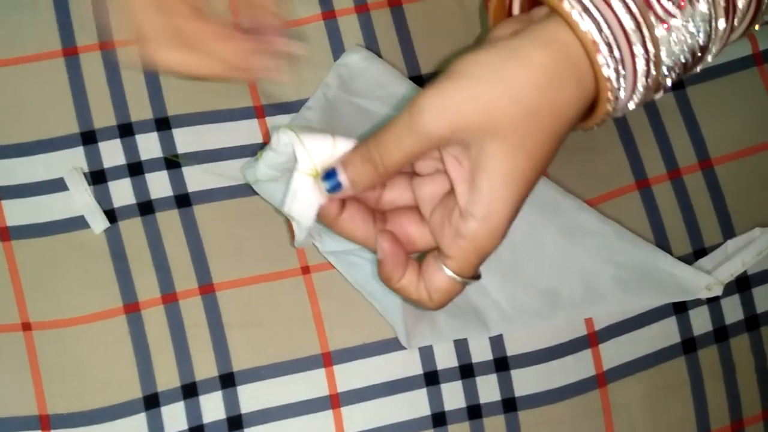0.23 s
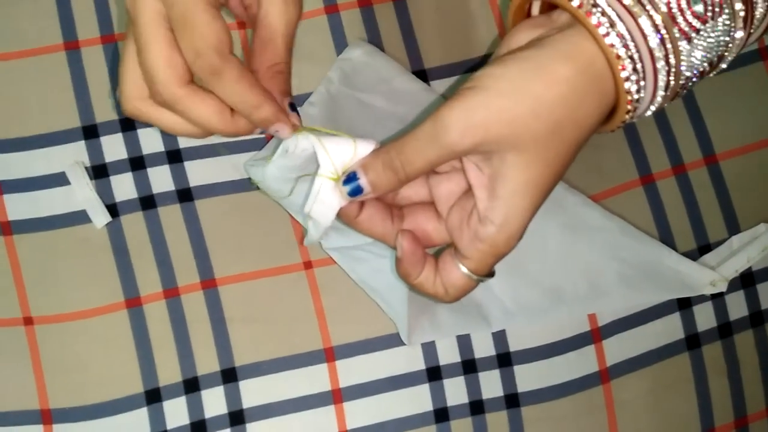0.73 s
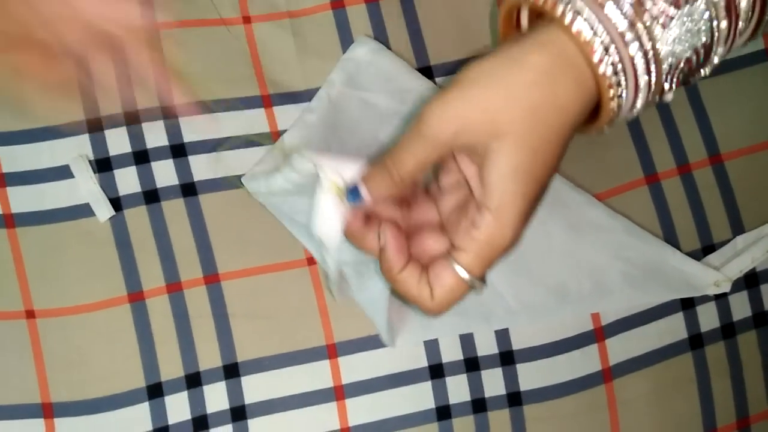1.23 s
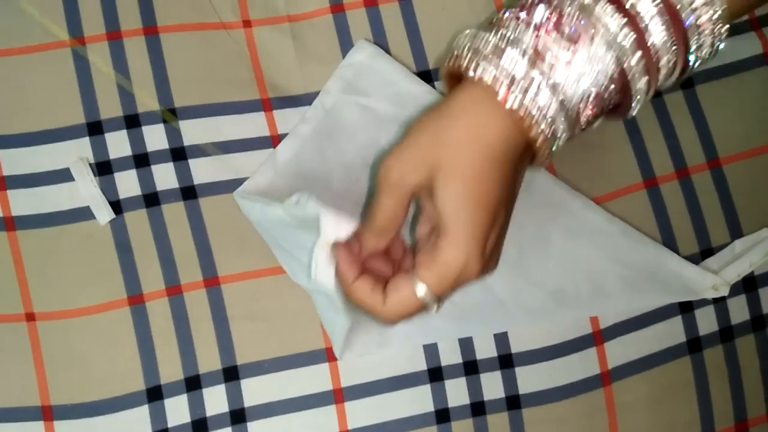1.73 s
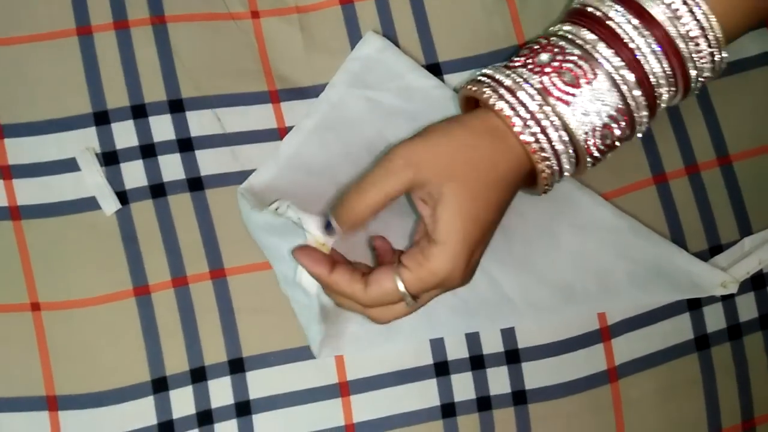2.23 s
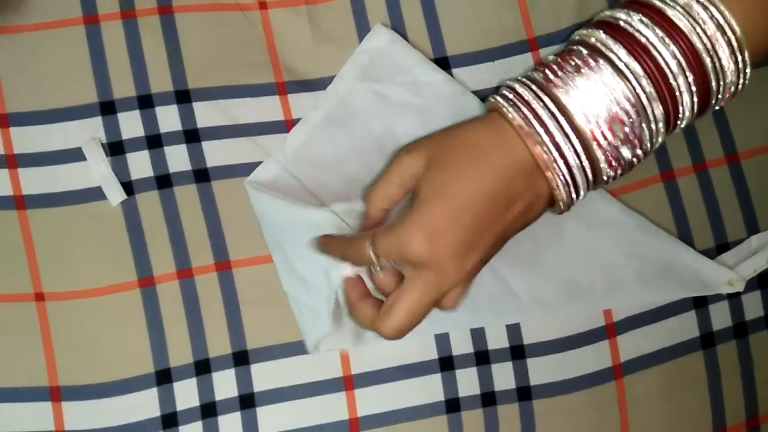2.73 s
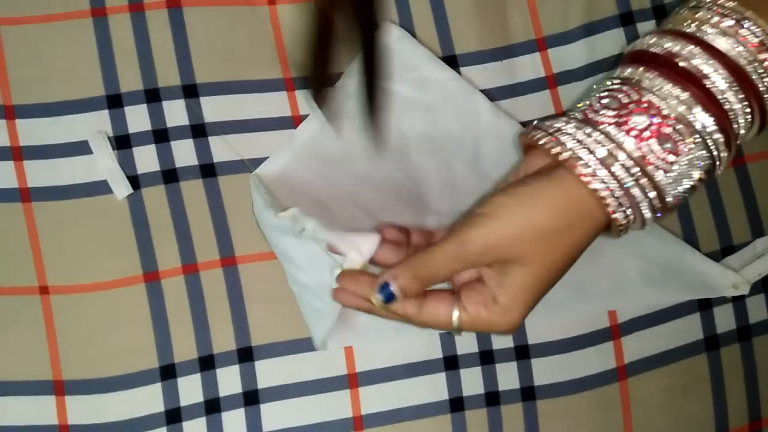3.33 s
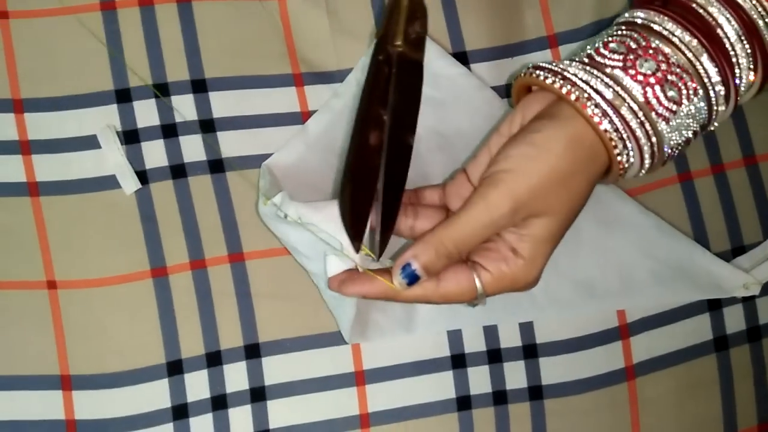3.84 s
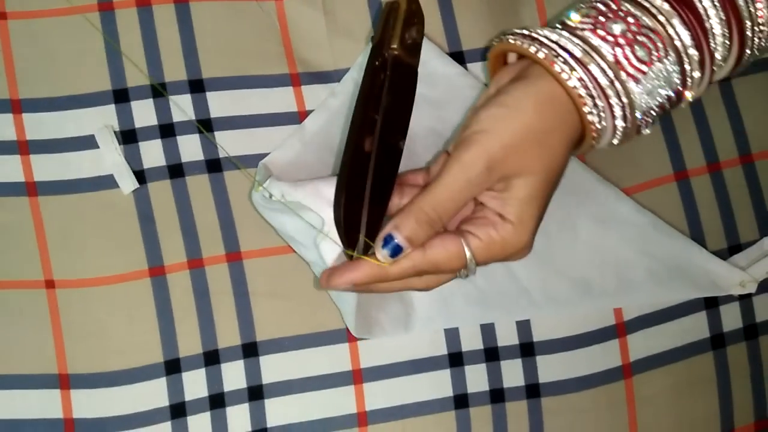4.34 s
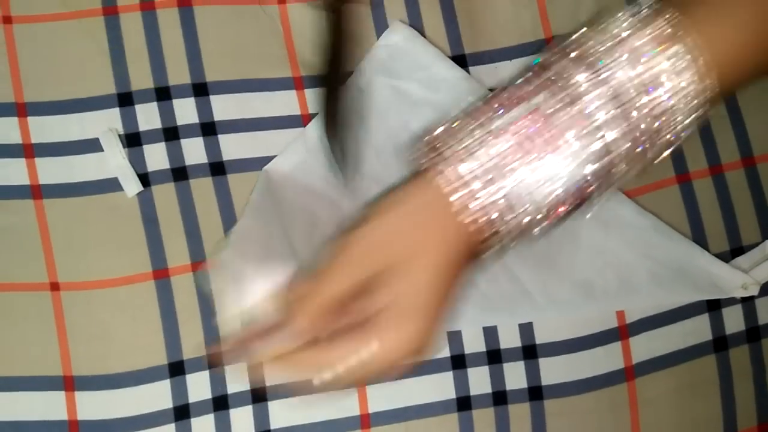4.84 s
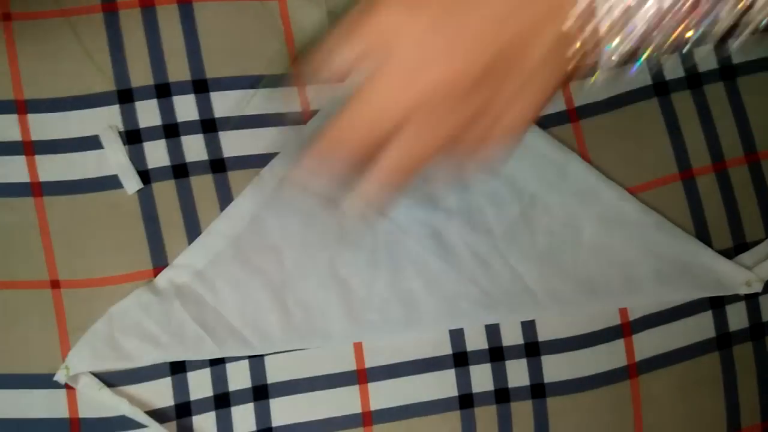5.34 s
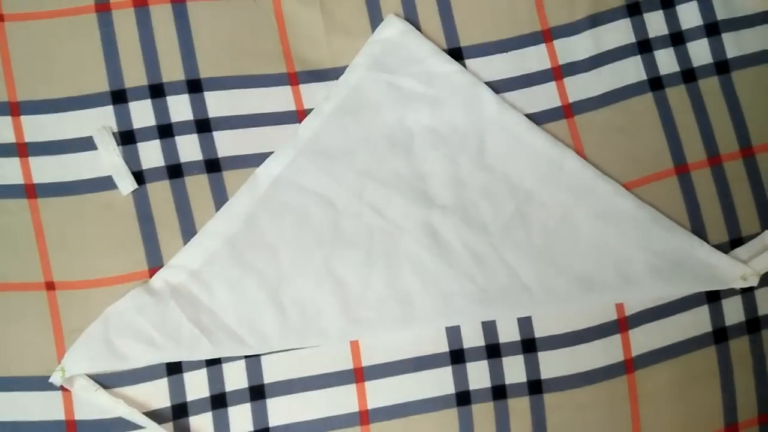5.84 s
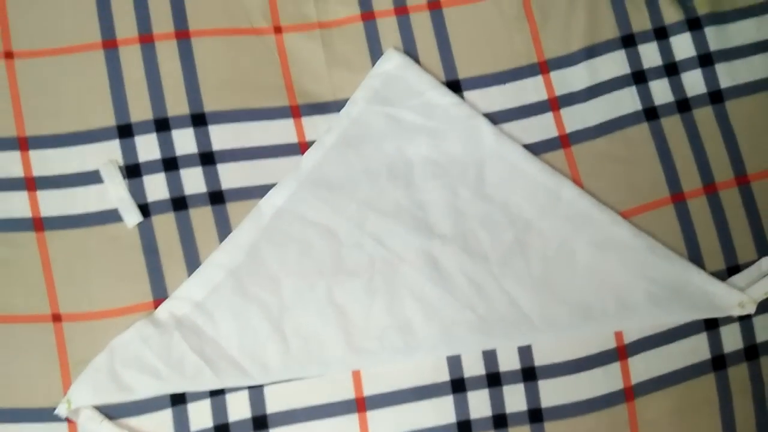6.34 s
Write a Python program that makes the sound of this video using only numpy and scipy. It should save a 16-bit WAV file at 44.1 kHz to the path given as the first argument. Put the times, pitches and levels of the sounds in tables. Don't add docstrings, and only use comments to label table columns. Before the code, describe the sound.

A quiet indoor room, heard close by a phone over a bed. A slow fan throbs in low, uneven puffs under thin hiss. A light bangle tick opens at 0.0 s. Far dove coos, barely audible, come between 0.6 and 2.8 s, with slight cloth rubs and a very faint touch near 1.6 s. At 2.45 to 2.6 s bangles click and slide in a small clatter with fabric rustle; another tick falls at 3.1, then a sharp loud clack at 3.3 s dies fast. Quiet returns, with a light knock at 4.55 and a firmer one at 4.82 s. Small rattles at 5.15 to 5.23 lead to the loudest part: four bright, dry shakes at about 5.35, 5.47, 5.56 and 5.67 s, thin metal ringing briefly. The room swells with them, then sinks. Tiny far horn beeps at 5.9 and 6.2 s, faint ticks, and fan to 6.5 s.

```python
import sys
import numpy as np
from scipy import signal
from scipy.fft import rfft, irfft, next_fast_len
from scipy.io import wavfile
from scipy.ndimage import uniform_filter1d

SR = 44100
rng = np.random.default_rng(int(sys.argv[2]) if len(sys.argv) > 2 else 0)


def put_to_file(sound):
    columns = np.atleast_2d(sound).T
    safe = np.clip(columns, -1, 1)
    whole_steps = np.round(safe * 32767)
    wavfile.write(sys.argv[1], SR, whole_steps.astype(np.int16))


def convert_level_to_amplitude(level_db):
    exponent = np.asarray(level_db, float) / 20
    return 10 ** exponent


N = 290619


def evened(x):
    return x / np.sqrt(np.mean(x ** 2) + 1e-20)


def read(points, hz):
    f, value = np.transpose(points)
    return np.interp(np.log(hz + 1), np.log(f + 1), value)


def add(mix, s, sound):
    part = mix[max(round(s * SR), 0):][:len(sound)]
    part += sound[:len(part)]


def coloured(x, points):
    size = next_fast_len(len(x))
    gain = convert_level_to_amplitude(read(points, np.fft.rfftfreq(size, 1 / SR)))
    return irfft(rfft(x, size) * gain, size)[:len(x)]


def seconds(length_s):
    return np.arange(round(length_s * SR)) / SR


# [f/Hz, level/dB per Hz]
HISS = [(2500, -40.5), (4500, -5.5), (6000, -3.5), (9000, -2), (14000, -3)]


def port_hiss():
    return [convert_level_to_amplitude(-84.5) * evened(coloured(z, HISS)) for z in rng.standard_normal((2, N))]


# [t/s, length/s, f/Hz, level/dB]
COOS = [
    (0.601, .12, 550, -90.5),
    (0.838, 0.35, 597, -92.5),
    (1.3, .12, 505, -92),
    (1.779, 0.45, 551, -94),
    (2.35, 0.42, 555, -96),
    (6.2, .39, 540, -99.5),
]


def dove():
    out = np.zeros(N)
    smooth = 1500
    for s, length_s, hz, db in COOS:
        t = seconds(length_s)
        waver = uniform_filter1d(rng.standard_normal((2, SR)), smooth)[:, :len(t)] * np.sqrt(smooth)
        tone = np.sin(2 * np.pi * hz * t + 0.8 * waver[1])
        add(out, s, convert_level_to_amplitude(db + 17 + 3.2 * waver[0]) * tone * signal.windows.tukey(len(t), .8))
    return out


# [t/s, length/s, partial spacing/Hz, level/dB]
BEEPS = [
    (5.913, 0.082, 346, -76.5),
    (6.167, 0.11, 346, -77),
]


def horn():
    out = np.zeros(N)
    for s, length_s, hz, db in BEEPS:
        t = seconds(length_s)
        tone = sum(np.sin(2 * np.pi * k * hz * t) for k in range(7, 10))
        add(out, s, convert_level_to_amplitude(db) * tone * signal.windows.tukey(len(t), .7))
    return out


# [t/s, puff level/dB]
DRAUGHT = [(0, -59.5), (.45, -65), (.75, -71.5), (1.1, -66.5), (1.5, -70.5), (1.9, -75), (2.3, -76),
           (2.6, -60.5), (2.9, -66.5), (3.3, -67.5), (3.6, -62), (4.2, -62.5), (4.6, -61), (4.82, -66),
           (5.1, -62), (5.5, -63), (6.0, -67.5), (6.3, -68)]
# [t/s, peak level/dB]
GUSTS = [(.031, -57), (.202, -59), (.387, -57.5), (1.003, -59.5), (1.11, -54.5), (1.206, -56), (1.407, -59),
         (1.666, -62), (1.988, -67), (2.152, -65), (2.653, -58), (2.868, -59.5), (2.914, -56),
         (3.17, -55.5), (3.278, -59), (3.473, -55.5), (3.619, -61), (3.99, -59), (4.257, -55.5),
         (4.384, -54), (4.694, -58), (4.916, -58), (5.167, -58.5), (5.372, -61), (5.674, -59),
         (5.742, -54.5), (6.068, -61), (6.363, -58.5)]


def puffs():
    gap_s, jitter, scatter_db = 0.049, .5, 4.5
    luck = rng.random((160, 2)) - .5
    s = gap_s * (np.arange(len(luck)) + .5 + jitter * luck[:, 0])
    db = np.interp(s, *np.transpose(DRAUGHT)) + scatter_db * luck[:, 1]
    return GUSTS + list(zip(s, db))


AIR_DB = -63.5
# [f/Hz, level/dB per Hz]
AIR = [(20, -41), (36, -21), (52, -8), (110, -14), (250, -22), (600, -28.5), (1000, -31.5), (1700, -28),
       (3000, -32.5), (4300, -34.5), (5300, -28.5), (6300, -41), (8000, -45.5), (14200, -51)]
PUFF_HZ = (54, 69.95, 92.14)
# [f/Hz, level/dB]
WHINE = [(1308, -87), (2191, -87), (3898, -83.5)]


def fan():
    t = np.arange(N) / SR
    air = convert_level_to_amplitude(AIR_DB - 5.0) * evened(coloured(rng.standard_normal(N), AIR))
    shape = np.hanning(2300)
    puff_t = t[:len(shape)]
    rows = puffs()
    for (s, db), phases in zip(rows, rng.random((len(rows), 3))):
        orders = zip((1., .5, .3), PUFF_HZ, phases)
        tone = sum(w * np.sin(2 * np.pi * (f * puff_t + p)) for w, f, p in orders)
        add(air, s - len(shape) / 2 / SR, convert_level_to_amplitude(db - 3.0) * shape * tone)
    waver_db = 4 * evened(uniform_filter1d(rng.standard_normal(N), 2500)) - 3.5
    whine = sum(convert_level_to_amplitude(db) * np.sin(2 * np.pi * f * t) for f, db in WHINE)
    return air + convert_level_to_amplitude(waver_db) * whine


# [t/s, length/s, centre f/Hz, width/Hz, level/dB]
RUBS = [(.57, .06, 4900, 700, -79), (.95, .18, 2690, 60, -88), (1.63, .08, 3200, 900, -75),
        (1.63, .08, 5200, 1200, -76), (2.47, .12, 5200, 1600, -72), (2.445, .14, 2000, 2400, -71),
        (2.83, .1, 5200, 1200, -82), (4.55, .06, 5500, 2500, -77), (.12, .025, 3500, 3000, -74),
        (3.4, .05, 5100, 900, -80), (4.85, .4, 1400, 500, -81), (5.045, .05, 5500, 2500, -75),
        (5.84, .025, 3200, 900, -75), (6.21, .03, 4600, 1000, -76)]


def cloth():
    out = np.zeros(N)
    for s, length_s, hz, width_hz, db in RUBS:
        grit = rng.standard_normal(20000)[:round(length_s * SR)]
        edges_hz = [hz - width_hz / 2, hz + width_hz / 2]
        band = signal.sosfilt(signal.butter(2, edges_hz, "band", fs=SR, output="sos"), grit)
        add(out, s, convert_level_to_amplitude(db + 2.4) * evened(band) * signal.windows.tukey(len(band), .6))
    return out


def level_db(x, size):
    return 10 * np.log10(abs(uniform_filter1d(x ** 2, size)) + 1e-12)


def gate(room, near):
    own_db = level_db(room, 900) - AIR_DB
    own_db = 7 * np.tanh(own_db / 7)
    fall_db = np.arange(N) * 1600.0 / SR
    held_db = np.maximum.accumulate(level_db(near, 500) + fall_db) - fall_db
    open_db = np.clip(0.48 * (held_db + 67), 0, 27)
    smooth_db = signal.lfilter([.003], [1, -.997], open_db)
    bass = signal.sosfiltfilt(signal.butter(2, 130, fs=SR, output="sos"), room)
    moved = bass * convert_level_to_amplitude(0.41 * own_db - 0.47) + (room - bass) * convert_level_to_amplitude(.8 * own_db)
    return moved * convert_level_to_amplitude(smooth_db)


# [f/Hz, t60/s]
WALLS = [(300, 0.076), (2000, .13), (5000, .115), (8000, 0.11), (12000, 0.072)]


def walls(x):
    hz, t, z = signal.stft(rng.standard_normal(SR // 3), SR, nperseg=128)
    decay = convert_level_to_amplitude(-60 * t / read(WALLS, hz)[:, None])
    tail = signal.istft(z * decay, SR, nperseg=128)[1]
    tail[:130] = 0
    return signal.fftconvolve(x, tail / np.linalg.norm(tail))[:N]


# [t/s, peak/dB, ring f/Hz, thick/dB re peak, thin/dB re peak]
BLOWS = [(3.2978, -17.5, 5000, -20.5, -21), (3.3012, -15, 5290, -25, -23), (3.3061, -23.5, 4700, -26, -14),
         (3.3102, -26, 4858, -21, -17), (4.8194, -33, 5020, -21.5, -27), (4.822, -27.5, 5990, -12, -17),
         (5.3412, -8.5, 4850, -21.5, -22), (5.3455, -10, 5260, -13.5, -20),
         (5.3506, -6.5, 5354, -18.5, -20), (5.3613, -18.5, 5426, -29, -24.5),
         (5.3652, -15.5, 3940, -16, -18.5), (5.3756, -17, 4930, -23, -16.5),
         (5.3821, -15, 4820, -18.5, -24.5), (5.4591, -22.5, 4900, -20.5, -30), (5.466, -16, 5640, -10, -31),
         (5.4738, -15, 5400, -10, -22.5), (5.5561, -13, 5350, -9.5, -14.5),
         (5.5602, -15.5, 4960, -6.5, -3.5), (5.566, -13.5, 5130, -10.5, -7.5), (5.5679, -9, 5100, -20, -20),
         (5.5827, -16.5, 5010, -24.5, -8.5), (5.6608, -19.5, 5570, -12.5, -9),
         (5.6693, -15.5, 5200, -13, -11.5), (5.6796, -26.5, 4980, -30, -11.5)]
# [t/s, peak/dB, ring f/Hz, thin/dB re peak]
MORE_KNOCKS = [(0.015, -43.5, 5650, -9.5), (0.13, -60, 5870, -21), (1.525, -56.5, 5830, -16),
               (1.6597, -60, 4830, -24), (2.4427, -47.5, 4960, -13), (2.446, -41, 5300, -11),
               (2.5968, -54.5, 5510, -12), (3.2925, -36.5, 5400, -16), (3.3349, -51.5, 5130, -18),
               (4.8555, -45, 5270, -18), (5.0545, -56.5, 4480, -20), (5.4361, -32, 4890, -23.5),
               (5.5452, -37, 6720, -23.5), (5.5505, -29.5, 5150, -10.5), (5.6562, -31, 6850, -11),
               (5.7442, -51.5, 5320, -14), (5.9388, -60.5, 5170, -22), (6.3232, -56.5, 5100, -31)]
# [t/s, length/s, first knock/dB, ring f/Hz, thin/dB re peak]
CLATTERS = [(0.0264, .013, -42, 5920, -17), (2.4497, 0.018, -35, 5160, -30),
            (2.495, 0.017, -43.5, 5520, -8), (2.6037, 0.011, -48, 5340, -11),
            (3.085, 0.0067, -43.5, 5350, -20), (3.2747, 0.012, -43, 5600, -6.5),
            (4.5427, 0.022, -40, 4970, -15), (4.8293, 0.016, -29, 5110, -25),
            (5.146, 0.03, -53.5, 4920, -29), (5.2062, 0.019, -55, 4920, -16),
            (5.228, 0.03, -40.5, 5720, -14), (5.3033, 0.066, -48.5, 5150, -25),
            (5.357, 0.066, -21.5, 5175, -21), (5.478, 0.032, -25.5, 5080, -21.5),
            (5.5745, 0.064, -24.5, 5060, -9), (5.684, 0.015, -31.5, 5170, -10.5),
            (5.8455, 0.0085, -53.5, 5040, -31), (6.223, 0.0086, -56, 4500, -32)]


def knocks():
    gap_s, gap_growth, gap_jitter = .0038, 1.07, .5
    settle_db, scatter_db, pitch_spread = -14.5, 3.5, .09
    thick_start_db, thick_settle_db = -10, -9.5
    rows = list(BLOWS)
    rows += [(s, db, hz, thick_start_db, thin_db) for s, db, hz, thin_db in MORE_KNOCKS]
    lucks = rng.random((len(CLATTERS), 4, 12)) - .5
    for (start, length_s, db, hz, thin_db), luck in zip(CLATTERS, lucks):
        gaps = gap_s * gap_growth ** np.arange(luck.shape[1]) * (1 + gap_jitter * luck[0])
        late = np.cumsum(gaps) - gaps[0]
        u = late / length_s
        peak_db = db + settle_db * u + scatter_db * luck[1] * (u > 0)
        ring_hz = hz * (1 + pitch_spread * luck[2])
        tilt_db = 2 * scatter_db * luck[3]
        thick_db = thick_start_db + thick_settle_db * u + tilt_db
        bounces = np.transpose([start + late, peak_db, ring_hz, thick_db, thin_db - tilt_db])
        rows += list(bounces[u <= 1])
    return rows


def ring(hz, t60, phase, rise, size=1400):
    t = np.arange(size) / SR
    return (1 - np.exp(-t / rise)) * convert_level_to_amplitude(-60 * t / t60) * np.sin(2 * np.pi * (hz * t + phase))


# [f/Hz, level/dB per Hz]
SNAP = [(88, -46.5), (150, -21), (755, -29.5), (1040, -23), (2110, -20), (3530, -10.5), (5260, 3),
        (7400, -7), (10200, -27), (12400, -18), (14100, -46.5)]


def snap():
    log_gain = np.log(convert_level_to_amplitude(read(SNAP, abs(np.fft.fftfreq(4096, 1 / SR)))))
    pulse = np.fft.ifft(np.exp(np.conj(signal.hilbert(log_gain)))).real[:1024]
    return pulse / abs(pulse).max()


# [lowest f/Hz, highest f/Hz, t60/s]
THICK = (1900, 3400, 0.0093)
# [lowest f/Hz, highest f/Hz, t60/s]
THIN = (6500, 12800, .014)


def knock_body(hz, thick_db, thin_db, luck):
    body = 2.3 * ring(hz, 0.013, luck[0, 0], 0.002)
    for a, b in luck[:2, 1:4].T:
        body += 0.51 * ring(hz * (.82 + .36 * a), 0.016, b, 0.0011)
    sets = ((luck[:2, 4:9], THICK, thick_db), (luck[:2, 9:], THIN, thin_db - 2))
    for picks, (lo_hz, hi_hz, t60), share_db in sets:
        for a, b in picks.T:
            mode_hz = lo_hz * (hi_hz / lo_hz) ** a
            body += convert_level_to_amplitude(share_db - 13 * b) * ring(mode_hz, t60 * (0.9 + b), a + b, 0.00051)
    return body


# [t/s, f/Hz, level/dB, t60/s]
RINGS = [(.018, 2337, -63, 0.1), (.018, 11300, -59, 0.04), (.018, 12200, -65, 0.12),
         (2.443, 368, -52.5, 0.023), (2.446, 220, -56, 0.036), (2.496, 1480, -58.5, 0.035),
         (2.496, 12500, -76, 0.044), (2.496, 8300, -53, 0.02), (2.6, 1340, -62, 0.031),
         (3.084, 2350, -67, 0.04), (3.273, 8260, -47, 0.022), (3.299, 2340, -24, 0.019),
         (3.3002, 5060, -18, .009), (3.301, 4650, -24, 0.019), (3.301, 7480, -25, 0.025),
         (3.298, 6530, -21, .015), (4.543, 2310, -46, 0.015), (4.82, 302, -64, 0.038),
         (.62, 333, -74, 0.25), (3.3, 11250, -47.5, 0.062), (4.818, 2197, -35.5, 0.029),
         (4.851, 2220, -54, 0.05), (4.819, 4520, -34.5, .02),
         (5.3, 1573, -56.5, .05), (5.342, 1050, -35.5, 0.0303), (5.339, 1800, -32, 0.019),
           (5.348, 12430, -38.5, .025), (5.373, 2600, -33.5, 0.02), (5.557, 11990, -28.5, 0.09),
           (5.575, 11840, -32.5, 0.07), (5.557, 6600, -38, 0.078), (5.557, 8300, -23, 0.027),
           (5.558, 2430, -30.5, 0.056), (5.558, 385, -32, 0.019), (5.558, 850, -40, 0.01974),
           (6.1, 17000, -44.5, 0.035), (5.658, 8270, -26, 0.02), (5.659, 1383, -38, 0.042)]


def bangles():
    rows = knocks()
    out, clicks = np.zeros(N), np.zeros((2, N))
    for (s, db, hz, thick_db, thin_db), luck in zip(rows, rng.random((len(rows), 4, 24))):
        add(out, s - .0012, convert_level_to_amplitude(db) * knock_body(hz, thick_db, thin_db, luck))
        lag_s = 0.017 * luck[2] ** 1.6 - .002
        size = convert_level_to_amplitude(0.95 * db - 3.0 - 1000 * abs(lag_s)) * (2 * luck[3] - 1)
        at = np.round((s + lag_s) * SR).astype(int)
        np.add.at(clicks, (slice(None), at), size * convert_level_to_amplitude([[0], [0.19 * thick_db + 9]]))
    for s, hz, db, t60 in RINGS:
        add(out, s, convert_level_to_amplitude(db + 7) * ring(hz, t60, 0, 0.0015, size=6000))
    click = snap()
    dull = signal.sosfilt(signal.butter(2, 3000, fs=SR, output="sos"), click)
    return out + signal.oaconvolve(clicks, [click - dull, dull], axes=1)[:, :N].sum(0)


# [f/Hz, side re mid/dB]
SIDE_DB = [(60, -71.5), (1000, -61.5), (3300, -64), (4500, -34.5), (8000, -9.5), (10500, -10),
           (12500, -27.5)]


def scene():
    dry = bangles()
    near = dry + convert_level_to_amplitude(-12) * walls(dry)
    room = fan() + dove() + horn() + cloth()
    mid = near + gate(room, near)
    side = convert_level_to_amplitude(-3.5) * coloured(np.roll(mid, 40), SIDE_DB)
    return np.array([mid + side, mid - side]) + port_hiss()


def band_limit(x):
    return signal.sosfilt(signal.butter(12, 14280, fs=SR, output="sos"), x)


def record(dry):
    dry = signal.sosfilt(signal.butter(4, 38.5, "high", fs=SR, output="sos"), dry)
    limited = signal.oaconvolve(dry, signal.firwin(101, 14700, fs=SR)[None], "same")
    return band_limit(limited)


dry = scene()
out = record(dry)
put_to_file(out)
```